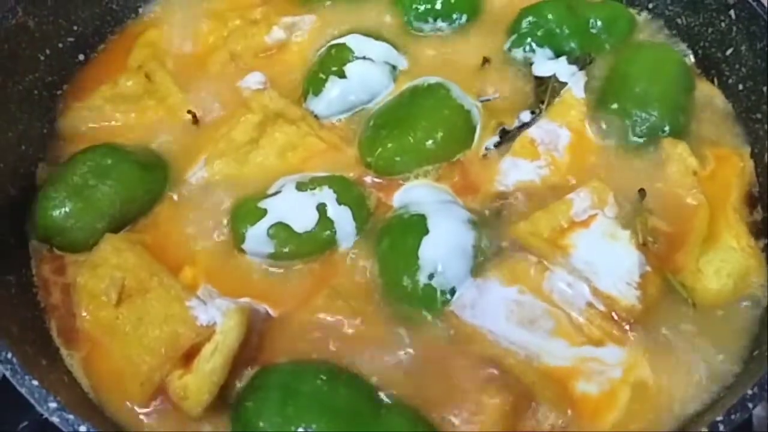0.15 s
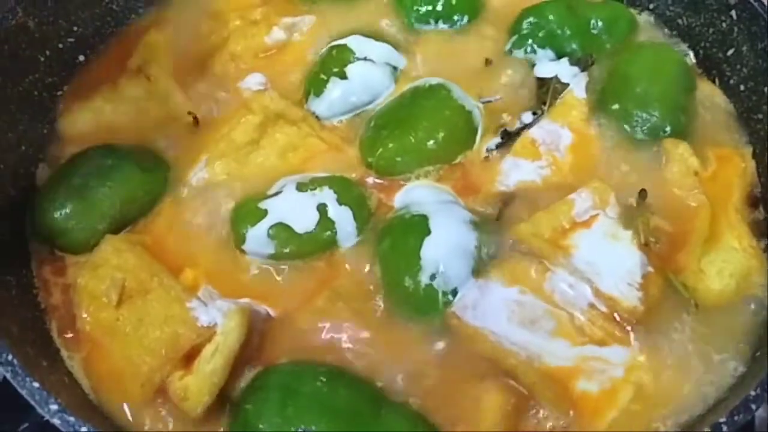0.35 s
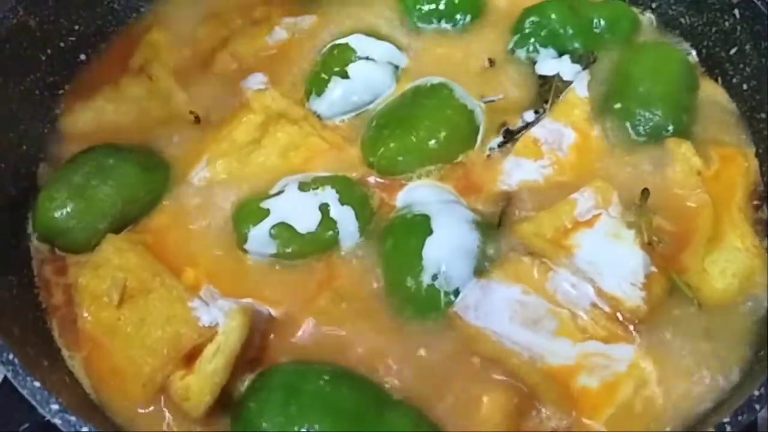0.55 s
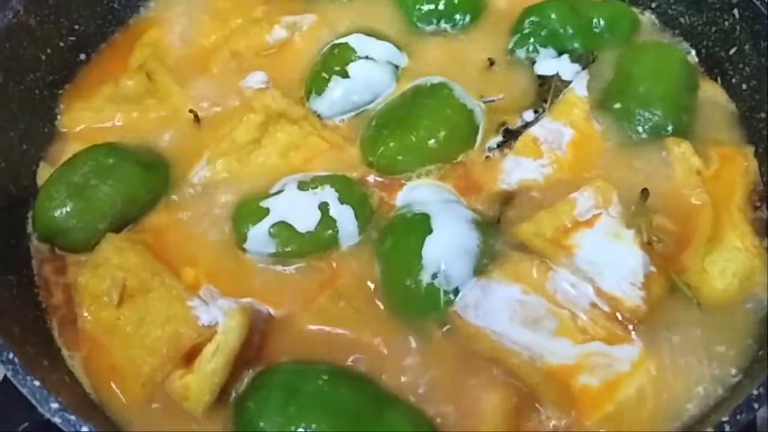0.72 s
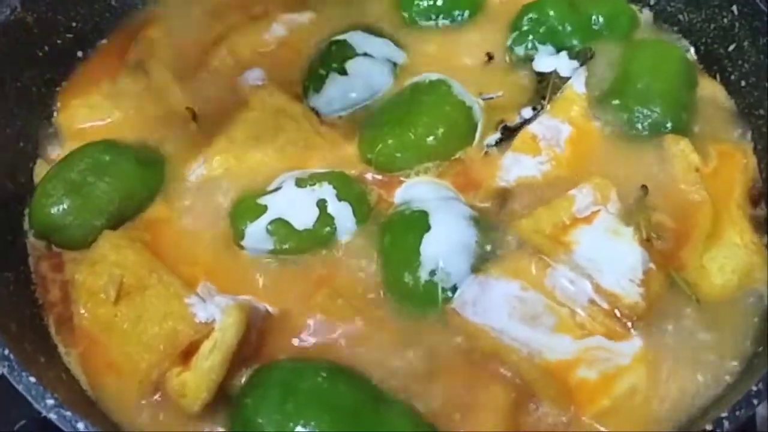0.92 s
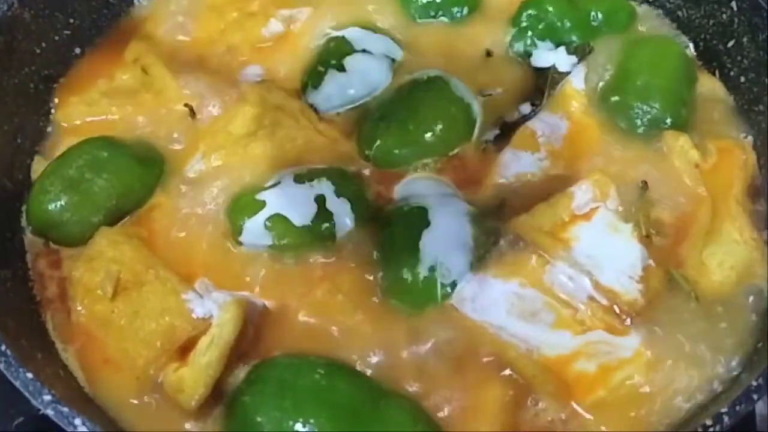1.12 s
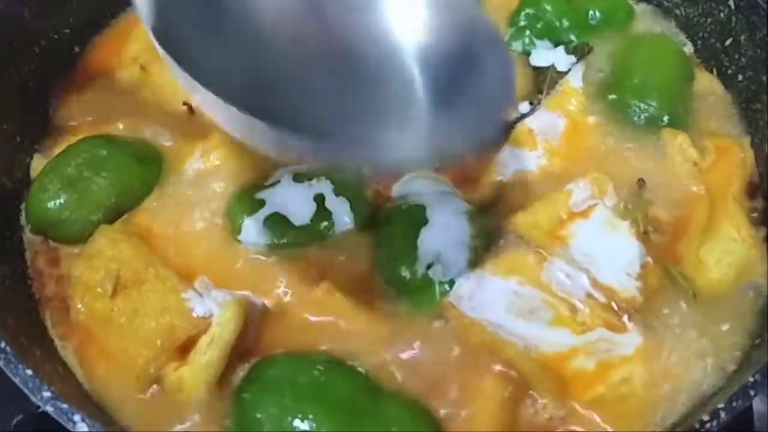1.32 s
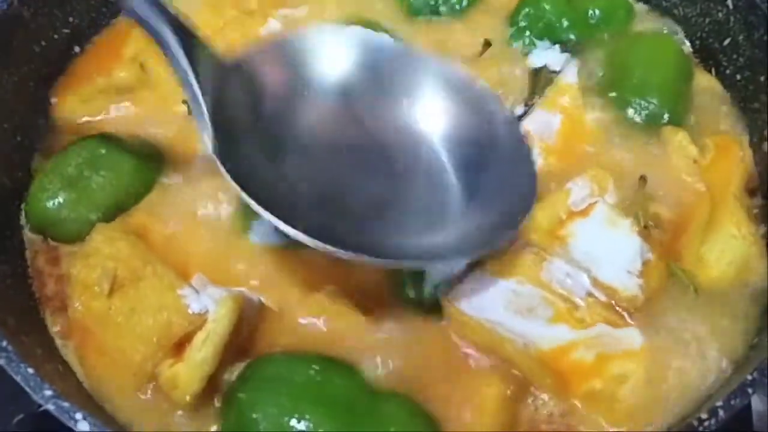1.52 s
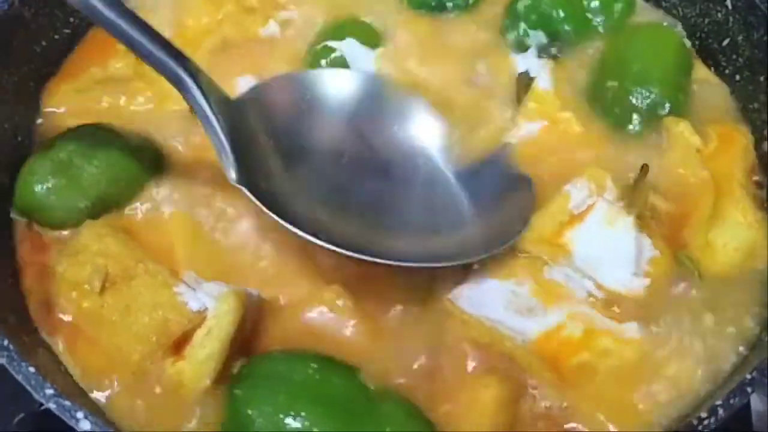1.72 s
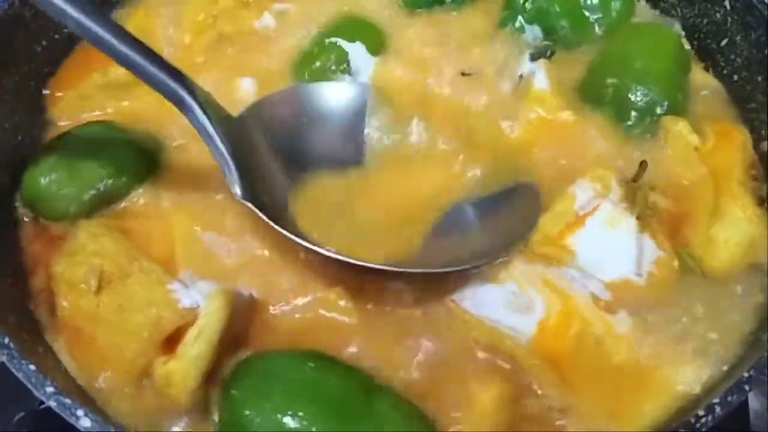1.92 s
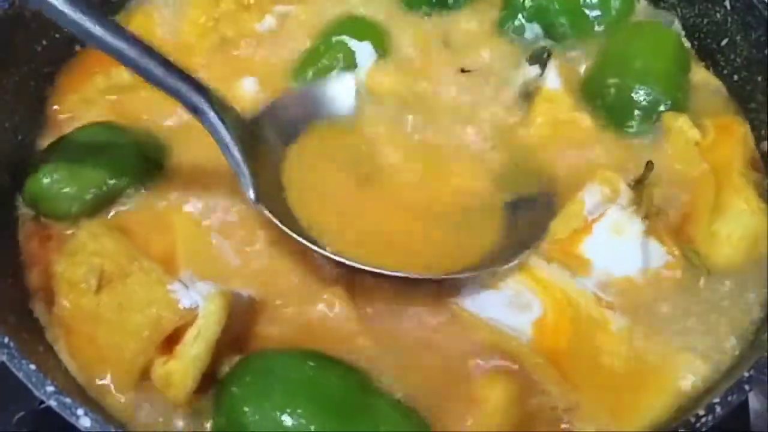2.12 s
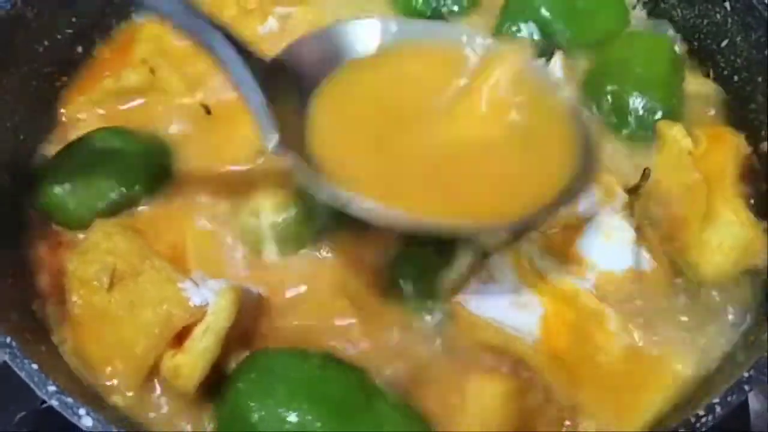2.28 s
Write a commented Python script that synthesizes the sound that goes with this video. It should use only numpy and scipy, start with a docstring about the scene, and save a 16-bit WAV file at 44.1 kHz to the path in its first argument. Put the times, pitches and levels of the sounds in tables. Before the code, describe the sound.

Thick stew simmering in a pan, dull bubbling pops, with one short loud steel clatter early on

```python
"""A thick stew simmers in a pan close to the microphone: bubbles, as damped chirps, pop and plop dully.
Beneath them lie a fine sizzle of tiny sine ticks, a few noisy spits and a seething bed of coloured noise.
Early on, a piece of steel kitchenware clatters nearby: a few hard knocks, then it rocks to rest.
Each knock is a noise crack plus energy fed into shared ringing modes.
A small kitchen adds a short tail to the bubbles, spits and cracks."""
import sys
import numpy as np
from scipy import signal
from scipy.fft import rfft, irfft
from scipy.io import wavfile
from scipy.ndimage import uniform_filter1d

SR = 44100
rng = np.random.default_rng(int(sys.argv[2]) if len(sys.argv) > 2 else 0)


def int16_out(signal):
    """Quantize to a 16-bit WAV file."""
    q = np.round(np.clip(np.atleast_2d(signal).T, -1, 1) * 32767)
    wavfile.write(sys.argv[1], SR, q.astype(np.int16))


N = 103635

# Levels and gains in the tables are relative: the settings below scale them.
# seething bed, spectral colour: f/Hz, gain/dB
SEETHE_COLOUR = [(24, -49), (48, -19), (75, -8.5), (160, -1.5), (300, -8), (520, -5.5), (660, -9),
                 (1100, -3), (1450, -2), (1750, 4.5), (2400, -8), (2800, -10), (3800, -18), (4850, -14),
                 (5120, -11), (5700, -14.5), (7100, -23), (8200, -9), (9200, -19), (12300, -17.5),
                 (15500, -18.5)]
# sizzle, spectral colour: f/Hz, gain/dB
SIZZLE_COLOUR = [(1000, -55), (3000, -5.5), (4000, -3.5), (5200, -5), (6500, -2), (8200, -2.5),
                 (10000, -1.5), (12500, -6.5), (15500, 2.5)]
# bursting bubbles: t/s, level/dB, starting f/Hz, t60/ms
BURSTS = [(0.0703, -22, 1110, 8.7), (0.1060, -43, 2260, 94), (0.1212, -31.5, 980, 21),
          (0.6907, -46, 1340, 8.7), (0.7850, -32, 1210, 8.7), (0.8033, -28, 1480, 7.9),
          (0.9236, -21.5, 1270, 4), (0.9315, -35, 1040, 14), (0.9357, -33.5, 1240, 6.2),
          (0.9574, -28.5, 1210, 6.4), (0.9755, -31.5, 2060, 7), (0.9937, -25.5, 950, 10),
          (0.9978, -34, 1010, 10), (1.0267, -32.5, 1730, 8.8), (1.0566, -31.5, 1250, 8),
          (1.0680, -39.5, 1110, 19), (1.1340, -36, 804, 16), (1.4303, -23.5, 1484, 3.7),
          (1.4394, -28.5, 1260, 4.3), (1.4575, -25, 1500, 3.1), (1.4829, -27, 1550, 4.9),
          (1.5089, -36, 1520, 6), (1.5398, -32, 1070, 8), (1.5484, -16.5, 1180, 5.6),
          (1.5545, -29.5, 1040, 13), (1.5647, -23, 1300, 15), (1.6339, -27.5, 1640, 4.5),
          (1.6574, -29, 980, 14), (1.6800, -36, 1220, 17), (1.7802, -35, 1560, 6.8),
          (1.8139, -38.5, 810, 9.3), (1.845, -36, 836, 13), (1.8600, -35.5, 1170, 12),
          (1.9772, -26.5, 1110, 8), (1.9940, -25, 1550, 3.9), (1.9981, -24, 1290, 12),
          (2.0025, -31, 1460, 23), (2.0304, -17.5, 2000, 5.8), (2.0706, -26.5, 1340, 5.2),
          (2.1431, -28, 2170, 7.1), (2.1593, -25, 1580, 2.7), (2.1705, -27, 930, 12),
          (2.1828, -28, 1330, 5.9), (2.265, -29, 1270, 6.1), (2.3002, -20, 1390, 10.7),
          (2.3045, -26.5, 1800, 4.7), (2.3459, -39, 1440, 7.9)]
# larger bubbles plopping in the sauce: t/s, level/dB, starting f/Hz
LARGE_BUBBLES = [(0.071, -40.5, 446), (0.163, -35.5, 377), (0.629, -39.5, 307), (0.762, -36.5, 486),
                 (0.930, -37, 333), (0.995, -37.5, 464), (1.161, -42, 455), (1.326, -38, 496),
                 (1.544, -33.5, 425), (1.552, -38, 310), (1.75, -43.5, 174), (1.848, -41, 330),
                 (1.883, -37, 530), (1.982, -43.5, 215), (2.171, -37, 363), (2.174, -38, 553),
                 (2.309, -43, 407)]
# muffling of the bubbles by thick sauce: f/Hz, gain/dB
SAUCE_MUFFLE = [(50, -14), (160, 4), (600, -0.5), (2500, 0), (3300, -25), (6000, -20.5)]
# sharp spits of sauce: t/s, level/dB, centre f/Hz
SAUCE_SPITS = [(0.154, -42.5, 4600), (0.713, -41, 4780), (0.792, -41.5, 8300), (1.55, -41, 5100),
               (1.641, -41.5, 4570), (1.780, -38.5, 3080), (1.782, -44, 5760)]
# knocks of the steel: t/s, then level/dB of body thud, first ring, second ring, 4-5 kHz shimmer, hard click
STEEL_KNOCKS = [(0.2011, -1, 1, -0.5, 4.5, -4), (0.2030, -2, -7.5, -11.5, 3.5, -12),
                (0.2126, 6.5, -14, -7, -12, -25.5), (0.2658, -12.5, 4, -28, -10, -25),
                (0.2718, -6, -10, -10, -3, 3), (0.2755, -22, -18, 7, 1, -14),
                (0.3055, -23.5, -15, 1, -0.5, 2), (0.3111, -16, -6, -5, -17, -4.5),
                (0.3197, -11.5, 5, -17, -5, -22), (0.3343, -5, -15, -25, -10, -7.5),
                (0.3493, -17, -3, -15, -17, -7.5), (0.3722, -23, 1.5, -8.5, -23, -24),
                (0.3900, -28, -3, -16, -26, -22), (0.4202, -12, -13, -17.5, -19.5, -18)]
# modes of the steel: f/Hz, level/dB, t60/s
STEEL_MODES = [(150.4, -34, 0.087), (388.7, -21, 0.07), (461.8, -25, 0.16), (945, -18.5, 0.14),
               (1205, -17.5, 0.25), (1376.4, -1, 0.21), (1338, -2, 0.071), (1439, -9, 0.25),
               (1997, -10, 0.37), (2017.4, -5, 0.25), (2435, -24, .2), (3500, -23.5, 0.1),
               (4328, -6, 0.027), (4450, -14, 0.069), (4570, -21, 0.083), (5078, -12.5, 0.043),
               (8090, -28, .27), (8400, -33, 0.23), (8870, -31.5, 0.19), (14500, -42, .13)]
# contact noise, spectral colour: f/Hz, gain/dB
CONTACT_COLOUR = [(30, -30), (55, -41), (90, -21), (140, -12), (260, -12.5), (420, -8), (650, -10.5),
                  (1000, 6.5), (1500, 5.5), (2600, -2.5), (3600, -11.5), (4700, -8), (5700, -18.5),
                  (7500, -22.5), (8700, -16), (10800, -41), (13800, -42), (14400, -29), (15200, -42)]

SEETHE_DB, SEETHE_WAVER_DB, SEETHE_WAVER_HZ = -51, -1.7, 13.08
SIZZLE_PER_S, SIZZLE_SCATTER_DB, SIZZLE_DB, SIZZLE_T60_S = 900, 3.5, -58.5, 0.0029
SMALL_PER_S, SMALL_HZ, SMALL_LOG_SPREAD, SMALL_T60_S = 110, 1274, 0.464, 0.0086
SMALL_FLOOR_DB, CLUSTER_FLOOR_DB, SMALL_RANGE_DB = -46, -46, 12.5
CLUSTER_SIZE, CLUSTER_HALF_WIDTH_S = 3, 0.047
POP_GAIN_DB, POP_RISE_S, POP_GLIDE_PER_S = 2, 0.00025, 3.3
FILM_DB, FILM_T60_S, FILM_TOP_HZ = -14, 0.026, 2800
FILM_LOW_SHARE = 0.3  # lowest spatter frequency / bubble pitch
PLOP_GAIN_DB, PLOP_T60_S, PLOP_RISE_S, PLOP_GLIDE_PER_S = 2, 0.024, 0.0013, 9.9
SPIT_T60_S, SPIT_HALF_WIDTH = 0.0083, 0.18  # width as a share of the centre
RING_DB, RING_RISE_S, RING_WAVER, RING_WAVER_HZ = -11.5, 0.00025, 0.00088, 88.7
CRACK_DB, CRACK_T60_S, RATTLE_DB, RATTLE_T60_S = 2.5, 0.018, -12.5, 0.3
HARDNESS_DB_PER_DB = 0.16  # extra crack level per dB of click or shimmer
ROOM_T60_S, ROOM_DELAY_S, STEEL_ROOM_DB, STEW_ROOM_DB = 0.45, 0.0034, -9.5, -10.5
ROOM_LOW_T60_S, ROOM_LOW_HZ, ROOM_LOW_DB = 0.71, 815, 1
TOP_HZ = 15600


def undb(db):
    """Decibels to amplitude gain."""
    return 10 ** (np.asarray(db) / 20)


def unit(x):
    """Scale to rms 1."""
    return x / np.sqrt(np.mean(x ** 2))


def seconds(n):
    """Time axis of n samples."""
    return np.arange(n) / SR


def fade(t, t60):
    """Exponential decay, 60 dB down after t60."""
    return np.exp(-np.log(1000) * t / t60)


def gain_at(hz, points):
    """Interpolate (f/Hz, gain/dB) points on a log-frequency axis, as amplitude gain."""
    f, db = np.array(points).T
    return undb(np.interp(np.log(np.maximum(hz, 1)), np.log(f), db))


def colour(x, points):
    """Minimum-phase filter through (f/Hz, gain/dB) points, by folding the cepstrum."""
    n = len(x)
    log_gain = np.log(gain_at(np.fft.rfftfreq(n, 1 / SR), points))
    cepstrum = irfft(log_gain, n)
    cepstrum[1:n // 2] *= 2
    cepstrum[n // 2:] = 0
    return irfft(rfft(x) * np.exp(rfft(cepstrum)), n)


def add(out, start_s, sound):
    """Mix a sound in at a time."""
    i = max(int(start_s * SR), 0)
    if i < len(out):
        out[i:i + len(sound)] += sound[:len(out) - i]


def walk(rate_hz):
    """Random wavering: ramps between random levels, with a spread near 1."""
    k = int(SR / rate_hz)
    steps = np.repeat(rng.standard_normal(N // k + 1), k)
    return uniform_filter1d(steps, k)[:N]


def bubble(hz, t60, rise, glide):
    """A damped air cavity whose pitch climbs as it opens."""
    t = seconds(SR // 20)
    cycles = hz * (t + glide * t ** 2 / 2)
    return np.sin(2 * np.pi * cycles) * fade(t, t60) * (1 - np.exp(-t / rise))


def kitchen(x, wet_db):
    """The direct sound plus a short diffuse tail in which the lows last longer."""
    t = seconds(SR // 2)
    low_noise, high_noise = rng.standard_normal((2, len(t)))
    low_pass = signal.butter(4, ROOM_LOW_HZ, fs=SR, output="sos")
    high_pass = signal.butter(4, ROOM_LOW_HZ, "high", fs=SR, output="sos")
    low = undb(ROOM_LOW_DB) * signal.sosfilt(low_pass, low_noise) * fade(t, ROOM_LOW_T60_S)
    high = signal.sosfilt(high_pass, high_noise) * fade(t, ROOM_T60_S)
    tail = (low + high) * (t > ROOM_DELAY_S)
    return x + undb(wet_db) * signal.fftconvolve(x, tail / np.linalg.norm(tail))[:N]


def seethe():
    """Countless merged bubbles: a soft, slightly wavering noise bed."""
    bed = unit(colour(rng.standard_normal(N), SEETHE_COLOUR))
    return bed * undb(SEETHE_DB + SEETHE_WAVER_DB * walk(SEETHE_WAVER_HZ))


def sizzle():
    """Tiny bright ticks where sauce meets the hot wall."""
    out, t = np.zeros(N), seconds(256)
    for when, pitch, size in rng.random((int(SIZZLE_PER_S * N / SR), 3)):
        hz = 3000 + 12500 * pitch
        db = SIZZLE_SCATTER_DB * min(-np.log(1 - size), 4.5)  # many faint, few loud
        tick = undb(db) * np.sin(2 * np.pi * hz * t) * fade(t, SIZZLE_T60_S)
        add(out, when * N / SR, tick)
    return undb(SIZZLE_DB) * unit(colour(out, SIZZLE_COLOUR))


def small_bubbles():
    """Faint pops of random size, scattered all over the pan and crowding around each larger burst."""
    out = np.zeros(N)
    burst_times = np.array(BURSTS)[:, 0]
    shape = (len(burst_times), CLUSTER_SIZE)
    offsets = CLUSTER_HALF_WIDTH_S * (rng.random(shape) - rng.random(shape))
    near = (burst_times[:, None] + offsets).ravel()
    anywhere = rng.random(int(SMALL_PER_S * N / SR)) * N / SR
    for times, floor_db in ((near, CLUSTER_FLOOR_DB), (anywhere, SMALL_FLOOR_DB)):
        for when, (u, v, size) in zip(times, rng.random((len(times), 3))):
            hz = SMALL_HZ * np.exp(2 * SMALL_LOG_SPREAD * (u - v))
            gain = undb(floor_db + SMALL_RANGE_DB * size ** 2)
            add(out, when, gain * bubble(hz, SMALL_T60_S, POP_RISE_S, POP_GLIDE_PER_S))
    return out


def pops():
    """Bubbles burst: the cavity rings for a few cycles and the torn film spatters."""
    out, t = np.zeros(N), seconds(SR // 20)
    for start, db, hz, t60_ms in BURSTS:
        band = signal.butter(4, [FILM_LOW_SHARE * hz, FILM_TOP_HZ], "band", fs=SR, output="sos")
        spatter = unit(signal.sosfilt(band, rng.standard_normal(len(t))))
        film = undb(FILM_DB) * spatter * fade(t, FILM_T60_S)
        cavity = undb(POP_GAIN_DB) * bubble(hz, t60_ms / 1000, POP_RISE_S, POP_GLIDE_PER_S)
        add(out, start, undb(db) * (cavity + film))
    return out


def plops():
    """Larger bubbles: lower cavities with a slower onset and a faster upward glide."""
    out = np.zeros(N)
    for start, db, hz in LARGE_BUBBLES:
        cavity = bubble(hz, PLOP_T60_S, PLOP_RISE_S, PLOP_GLIDE_PER_S)
        add(out, start, undb(db + PLOP_GAIN_DB) * cavity)
    return out


def spits():
    """A few droplets spit with a short bright tick of band noise."""
    out, t = np.zeros(N), seconds(SR // 20)
    for start, db, hz in SAUCE_SPITS:
        edges = [hz * (1 - SPIT_HALF_WIDTH), hz * (1 + SPIT_HALF_WIDTH)]
        band = signal.butter(2, edges, "band", fs=SR, output="sos")
        noise = unit(signal.sosfilt(band, rng.standard_normal(len(t))))
        add(out, start, undb(db) * noise * fade(t, SPIT_T60_S))
    return out


def clatter():
    """Each knock cracks and feeds energy into the same modes, weighted by where it lands; softer knocks crack less."""
    cracks, ring, t = np.zeros(N), np.zeros(N), seconds(SR // 2)
    energy = np.zeros((len(STEEL_MODES), N))
    contact = undb(CRACK_DB) * fade(t, CRACK_T60_S) + undb(RATTLE_DB) * fade(t, RATTLE_T60_S)
    onset = 1 - np.exp(-t / RING_RISE_S)
    for start, thud, first, second, shimmer, click in STEEL_KNOCKS:
        # weights: f/Hz, gain/dB
        treble = [(2600, click), (3500, click), (4200, shimmer), (5200, shimmer), (6000, click)]
        rings = [(1000, first), (1500, first), (1950, second), (2100, second)]
        ring_weight = [(500, thud)] + rings + treble
        crack_weight = [(500, thud), (1000, (first + click) / 2)] + treble
        noise = colour(rng.standard_normal(len(t)) * contact, CONTACT_COLOUR)
        hardness = undb(HARDNESS_DB_PER_DB * max(click, shimmer))
        add(cracks, start, hardness * colour(noise, crack_weight))
        for row, (hz, db, t60) in zip(energy, STEEL_MODES):
            level = undb(db + RING_DB) * gain_at(hz, ring_weight)
            add(row, start, (level * fade(t, t60) * onset) ** 2)
    for row, (hz, _, _) in zip(energy, STEEL_MODES):
        wavering_hz = hz * (1 + RING_WAVER * walk(RING_WAVER_HZ))
        ring += np.sqrt(row) * np.sin(2 * np.pi * np.cumsum(wavering_hz) / SR)
    return kitchen(cracks, STEEL_ROOM_DB) + ring


def scene():
    """The pan and the clatter, mixed to one channel."""
    bed = seethe() + sizzle()
    bubbles = colour(small_bubbles() + pops() + plops(), SAUCE_MUFFLE)
    stew = kitchen(bubbles + spits(), STEW_ROOM_DB)
    return (bed + stew + clatter())[None]


def record(dry):
    """The recorder rounds the loudest peaks and cuts the top."""
    rounded = dry / (1 + dry ** 6) ** (1 / 6)
    low_pass = signal.ellip(10, 0.2, 80, TOP_HZ, fs=SR, output="sos")
    return signal.sosfilt(low_pass, rounded)


dry = scene()
out = record(dry)
int16_out(out)
```